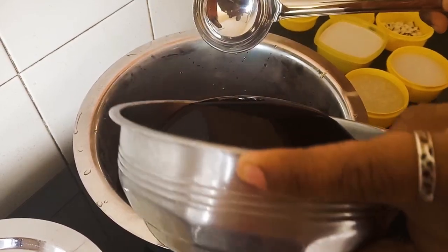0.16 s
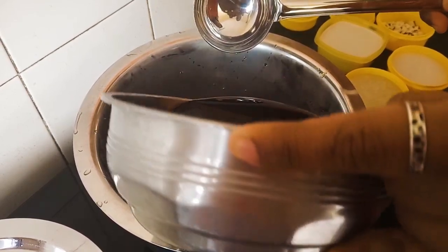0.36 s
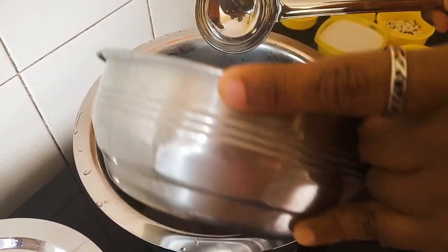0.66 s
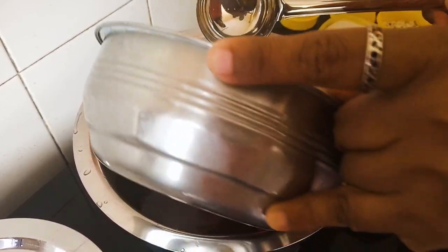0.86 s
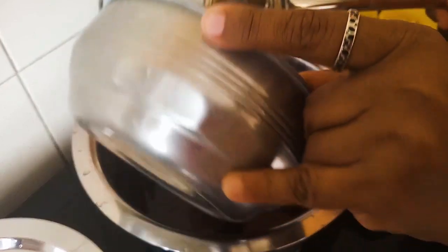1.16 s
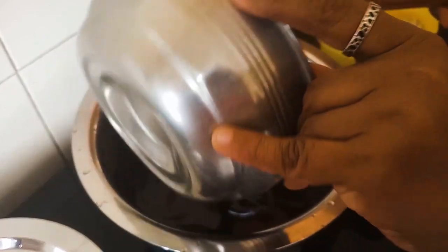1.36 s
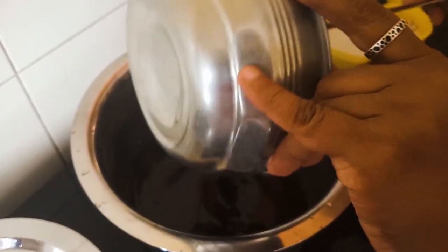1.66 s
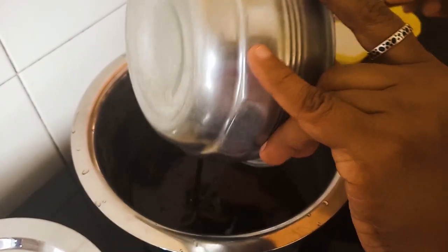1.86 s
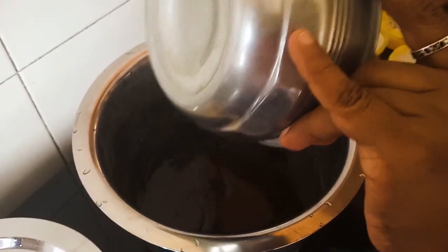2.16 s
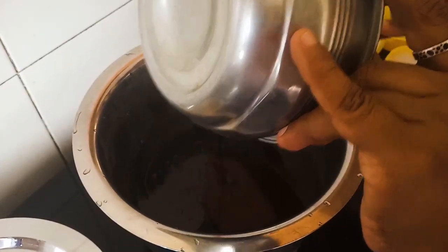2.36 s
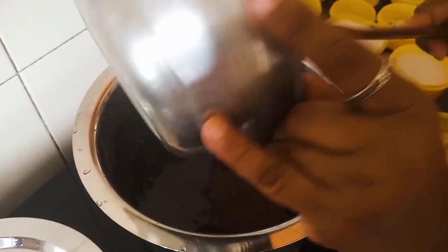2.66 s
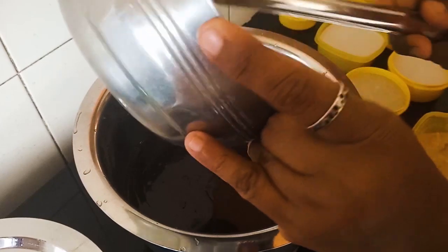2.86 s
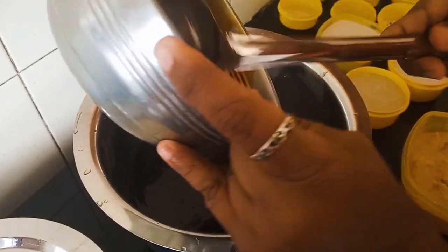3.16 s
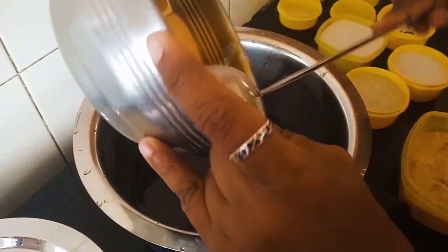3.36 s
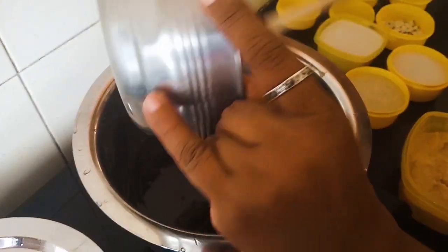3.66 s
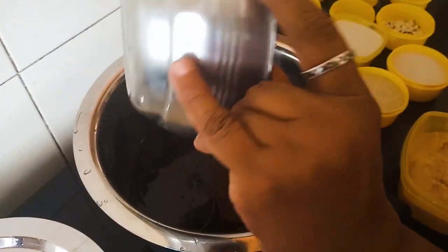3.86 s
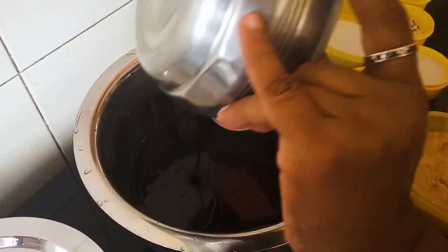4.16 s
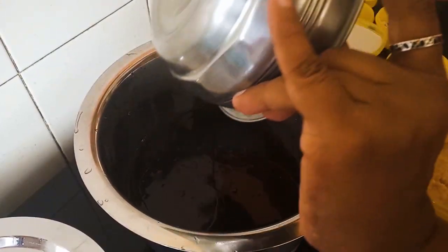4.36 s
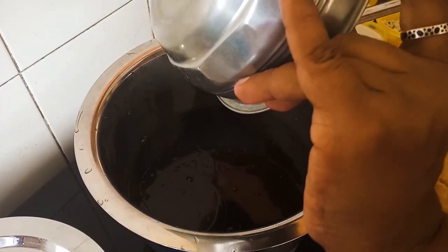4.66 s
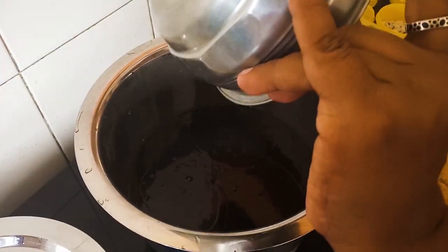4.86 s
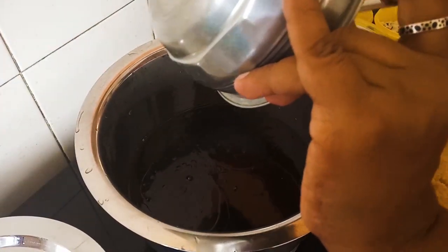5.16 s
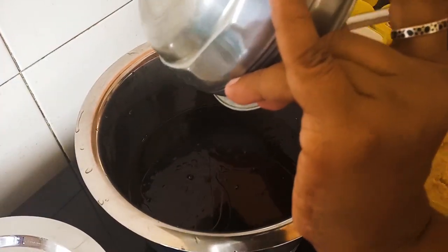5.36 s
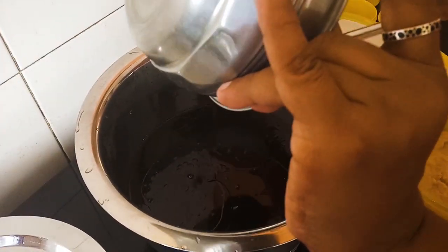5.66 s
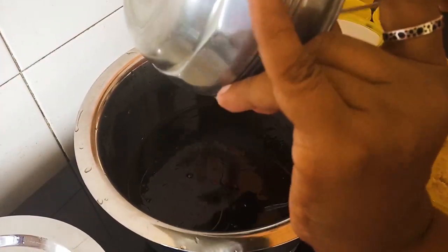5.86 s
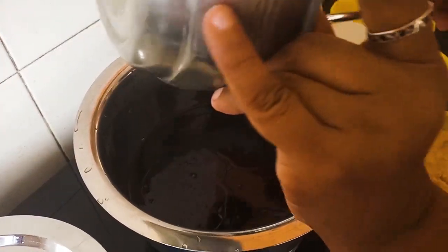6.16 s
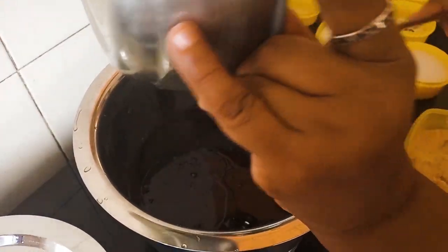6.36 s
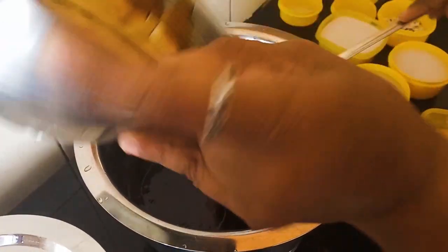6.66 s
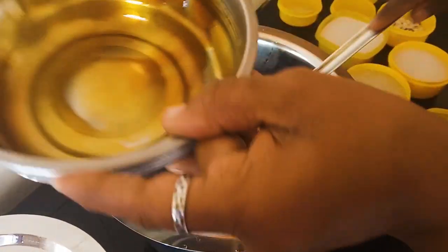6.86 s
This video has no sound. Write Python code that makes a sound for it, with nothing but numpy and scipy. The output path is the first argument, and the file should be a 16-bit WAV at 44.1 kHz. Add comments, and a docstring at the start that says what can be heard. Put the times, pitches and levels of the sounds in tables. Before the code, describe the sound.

A close microphone in a small tiled kitchen. From 0 s thick syrup pours into a hot steel pot: a bright, fierce sizzle settles quickly over a hollow, resonant churn, with a strong glug near 0.3 s and faint wavering hollow tones until 1.2 s. The stream thins and breaks off around 2.1-2.3 s, as a dull rim bump and hard ringing taps arrive, with short scrapes to 2.5 s. At 2.8-2.95 s a ladle clinks with a clear note, then a long, growing scrape with taps and small glugs runs to 3.5 s. A rim bump at 3.9 s leads to light scrapes, then brisk taps and strokes at 4.4-4.65 s. Another sharp group, partly hollow and humming, fills 5.0-5.5 s. After a quiet gap, two quick taps and a scrape at 6.25 s meet a soft low shudder until 6.7 s. Only faint hush and a barely audible tick at 6.9 s remain.

```python
"""Thick syrup runs in a thinning stream from a steel vessel into a hot steel pot: bubble impulses drive the
pot's resonances and a hot-steel sizzle, and trapped air glugs as clusters of rising chirps.
The vessel bumps the rim; a steel ladle clinks, taps its wet wall and scrapes it in short strokes: damped
modes and noisy snaps, struck once or driven by stick-slip grains. A low shudder follows late on.
A small tiled kitchen answers, over a faint steady hush; the microphone is close."""
import sys
import numpy as np
from scipy import signal
from scipy.fft import rfft, irfft, next_fast_len
from scipy.io import wavfile
from scipy.ndimage import uniform_filter1d

SR = 44100
rng = np.random.default_rng(int(sys.argv[2]) if len(sys.argv) > 2 else 0)


def master_out(mix):
    """Clip the mix to full scale and print it as 16-bit PCM to the path in sys.argv[1]."""
    frames = np.transpose(np.atleast_2d(mix))
    ceiling = np.clip(frames, -1, 1)
    pcm = np.round(ceiling * 32767).astype(np.int16)
    wavfile.write(sys.argv[1], SR, pcm)


N = 309818


def amp(db):
    """Decibels to gain."""
    return 10 ** (np.asarray(db) / 20)


def unit(x):
    """Scale to rms 1."""
    return x / np.sqrt(np.mean(x ** 2) + 1e-20)


def unit_attack(x):
    """Scale so that the first 20 ms have rms 1."""
    return x / np.sqrt(np.mean(x[:SR // 50] ** 2) + 1e-20)


def clock(count):
    """Times of the first count samples, in seconds."""
    return np.arange(count) / SR


def along(points, hz):
    """Interpolate (Hz, value) points on a log frequency axis."""
    point_hz, value = np.transpose(points)
    return np.interp(np.log(hz + 1), np.log(point_hz + 1), value)


def wobble(rate_hz, count=N):
    """A smooth random curve with rate_hz knots a second."""
    knots = rng.standard_normal(int(count * rate_hz / SR) + 4)
    fine = signal.resample_poly(knots, 8, 1)
    return np.interp(clock(count) * rate_hz * 8, np.arange(len(fine)), fine)


def add(track, s, sound):
    """Mix a sound into the track at time s."""
    part = track[max(round(s * SR), 0):][:len(sound)]
    part += sound[:len(part)]


def gate(t, start_s, end_s, attack_s, release_s):
    """Rise after start, hold until end, then fall to silence."""
    rise = np.clip((t - start_s) / attack_s, 0, 1)
    return rise * np.clip(1 - (t - end_s) / release_s, 0, 1)


def fade(t60_s, size=12288):
    """A ring envelope: onset time constant 0.65 ms, decay of 60 dB in t60_s."""
    t = clock(size)
    return np.exp(-np.log(1000) * t / t60_s) * (1 - np.exp(-t / 0.00065))


def coloured(x, points):
    """Shape a noise with the gain of (Hz, dB) points."""
    m = next_fast_len(len(x) + 8192)
    gain = amp(along(points, np.fft.rfftfreq(m, 1 / SR)))
    return irfft(rfft(x, m) * gain, m)[:len(x)]


def resonate(x, peaks):
    """Pass x through parallel (centre Hz, width Hz, dB) resonances."""
    m = next_fast_len(len(x) + SR // 4)
    f = np.fft.rfftfreq(m, 1 / SR)
    response = sum(amp(db) * 1j * f * w / (c * c - f * f + 1j * f * w) for c, w, db in peaks)
    return irfft(rfft(x, m) * response, m)[:len(x)]


def grains(rate_hz, spread_db):
    """Random one-sample impulses of uneven size, rms 1."""
    chance, polarity, spread = rng.random(N), rng.standard_normal(N), rng.standard_normal(N)
    return unit((chance < rate_hz / SR) * np.sign(polarity) * amp(spread_db * spread))


def cloud(colour, count, size=12288):
    """A sum of count modes at random pitches and of uneven strength, rms 1."""
    lines = np.zeros(size // 2 + 1, complex)
    picks = rng.integers(1, len(lines), count)
    lines[picks] = rng.standard_normal(count) + 1j * rng.standard_normal(count)
    return unit(irfft(lines * amp(along(colour, np.fft.rfftfreq(size, 1 / SR)))))


# still-room colour: freq_hz, density_db_per_hz
ROOM_COLOUR = [(20, -27.5), (60, 2), (110, 2.5), (200, -11), (400, -10), (600, -6), (900, -17), (1300, -23),
               (3000, -20), (6000, -27), (10000, -31), (13000, -46), (16000, -58)]
HUSH_DB = -75.5


def hush():
    """The still kitchen: steady coloured noise."""
    return amp(HUSH_DB) * unit(coloured(rng.standard_normal(N), ROOM_COLOUR))


def whine():
    """A very faint, narrow high band of noise."""
    return amp(-88.5) * unit(resonate(rng.standard_normal(N), [(6490, 25, 0)]))


# kitchen reverberation: freq_hz, t60_s
KITCHEN_T60 = [(150, 0.25), (400, 0.76), (1000, 0.53), (3000, 0.61), (7000, 0.43), (15000, 0.33)]
TAIL_STEP_S = .3


def kitchen(x):
    """Tiled walls return a short bright tail, whose colour drifts at random, crossfading every 0.3 s."""
    out, size = np.zeros(N), int(TAIL_STEP_S * SR)
    for start in range(0, N, size):
        hz, t, z = signal.stft(rng.standard_normal(SR), SR, nperseg=256)
        decay = np.exp(-np.log(1000) * t / along(KITCHEN_T60, hz)[:, None])
        tail = signal.istft(z * decay, SR, nperseg=256)[1]
        tail *= 1 - np.exp(-(clock(len(tail)) / 0.0027) ** 2)
        # triangular windows crossfade from one tail to the next
        span = np.arange(max(start - size, 0), min(start + size, N))
        part = x[span] * (1 - np.abs(span - start) / size)
        add(out, span[0] / SR, signal.fftconvolve(part, tail / np.linalg.norm(tail)))
    return out


RUMBLE_S, RUMBLE_END_S, RUMBLE_RAMP_S = 6.28, 6.68, .045
JOLT_DB, JOLT_DECAY_S, TREMBLE_DB = -40, .05, -63


def rumble():
    """A soft low shudder as the hand turns the vessel upright: a jolt dies to a faint tremble."""
    hollow, t = [(146, 47, 0)], clock(N)
    jolt = amp(JOLT_DB) * np.exp(-np.maximum(t - RUMBLE_S, 0) / JOLT_DECAY_S)
    envelope = gate(t, RUMBLE_S, RUMBLE_END_S, RUMBLE_RAMP_S, RUMBLE_RAMP_S)
    noise = resonate(resonate(rng.standard_normal(N), hollow), hollow)
    return unit(noise) * (jolt + amp(TREMBLE_DB)) * envelope


# pot modes woken by every contact: freq_hz, width_hz, level_db
AFTERRING_MODES = [(540, 3, 0), (640, 4, -3), (672, 4, -1), (1280, 3, -6), (2990, 3, -8), (4030, 3, -3),
                   (4950, 3, -6), (6630, 2, -5)]
AFTERRING_DB = 2


def afterring(metal):
    """Every contact wakes long faint modes in the pot."""
    return amp(AFTERRING_DB) * resonate(metal, AFTERRING_MODES)


def ring(modes, vary_db):
    """Damped sine modes, at new strengths for each place of contact."""
    hz, db, t60_s = np.transpose(modes)[:, :, None]
    decay = fade(t60_s)
    swing = np.sin((2 * np.pi * hz * clock(decay.shape[1])).astype(np.float32))
    strength = amp(db + vary_db * rng.standard_normal(hz.shape))
    return unit_attack(np.sum(strength * decay * swing, axis=0))


def shimmer(colour, t60_s, snap_db, snap_t60_s):
    """A noisy contact: a hard snap with a wash under one shared dense spectrum."""
    envelope = fade(t60_s) + amp(snap_db) * fade(snap_t60_s)
    return unit_attack(cloud(colour, count=6000) * envelope)


def steel(colour, t60_s, snap_db, snap_t60_s):
    """Thin steel has hundreds of high modes, under a brief noisy snap."""
    modes = cloud(colour, count=260) * fade(t60_s)
    snap = cloud(colour, count=3000) * fade(snap_t60_s)
    return unit_attack(modes + amp(snap_db) * snap)


def favour(colour, hz, boost_db):
    """The place of contact favours the modes around one pitch."""
    f = np.geomspace(100, 16000, 120)
    boost = boost_db * np.exp(-.5 * (np.log(f / hz) / 0.085) ** 2)
    return np.transpose([f, along(colour, f) + boost])


# syrup left inside weighs the shell down: time_s, pitch_share (of the empty vessel's)
DRAINING_PITCH = [(2.06, .9), (2.44, .923), (2.83, .983), (4.6, .995), (5.35, 1.004)]


def drained(s):
    """Pitch of the shell at time s, as a share of the empty vessel's."""
    return np.interp(s, *np.transpose(DRAINING_PITCH))


# short hollow resonances: freq_hz, level_db, t60_s
BELLY_MODES = [(748, -11, 0.094), (799, -6.5, 0.076), (901, 5.5, 0.069), (846, 6, 0.016), (960, 2, 0.034)]
# low shell modes, tuned by draining: freq_hz, level_db, t60_s
SHELL_MODES = [(958.2, 4, 0.12), (1081, -2, .06)]
BASS_HZ = 553  # a small vessel radiates little below this


def belly_ring(s):
    """The vessel's hollow note at time s; the grip detunes its resonances a little each time."""
    modes = [(hz * (1 + rng.normal(0, .015)), db, t60_s) for hz, db, t60_s in BELLY_MODES]
    modes += [(hz * drained(s), db, t60_s) for hz, db, t60_s in SHELL_MODES]
    note = ring(modes, vary_db=2)
    note = note * (1 - np.exp(-clock(len(note)) / 0.0061))
    return unit_attack(signal.lfilter(*signal.butter(2, BASS_HZ, "high", fs=SR), note))


# strongest high wall modes: freq_hz, level_db, t60_s
WALL_MODES = [(2720, -9, .14), (3110, -7, .14), (3450, -2, .14), (3590, 1, .14), (3900, -5, .2),
              (4450, -3, .14), (4800, -3, .14), (5164, -1, .18), (5440, -1, .16), (5795, 0, .14),
              (6070, -1, .14), (6600, -1, .14), (7020, -2, .14)]
WALL_RING_VARY_DB, WALL_DETUNE_SHARE = 5, .016


def wall_ring(place_hz):
    """The pressing edge favours wall modes near one pitch and pulls them a little out of tune."""
    modes = []
    for hz, db, t60_s in WALL_MODES:
        near_db = 4 * np.exp(-.5 * (np.log(hz / place_hz) / .14) ** 2)
        modes.append((hz * (1 + WALL_DETUNE_SHARE * rng.standard_normal()), db + near_db, t60_s))
    return ring(modes, vary_db=WALL_RING_VARY_DB)


# contact colours, each: freq_hz, density_db_per_hz
THUD_COLOUR = [(40, -32.5), (100, -8.5), (200, -8.5), (330, 2), (450, -2), (620, 2.5), (1000, -14),
               (1800, -33), (8000, -56)]
CLACK_COLOUR = [(300, -24), (900, 0.5), (1100, 4), (1650, 0), (2050, -4), (2800, -18), (5000, -27),
                (10000, -56.5)]  # dull, steel on steel
WALL_SPECTRUM = [(200, -45.5), (1300, -23), (2500, -11.5), (3400, -4), (5300, -2), (6900, -5),
                 (8000, -10.5), (10000, -36.5), (16000, -42.5)]
CRACK_SPECTRUM = [(1000, -48), (6000, -9), (8200, -1.5), (9800, 3.5), (11200, 0.5), (12500, -6),
                  (15500, -9)]
WALL_RING_DB, CRACK_DB = -6, -1.5
CLICK_DB, CLICK_T60_S = -11.5, .009  # first bite of steel on steel


def contact(s, thud, hollow, clack, edge, hz):
    """One contact thuds, rings the belly and wall, and cracks at the edge; strengths are gains before trims."""
    wall = steel(favour(WALL_SPECTRUM, hz, boost_db=11.0), t60_s=0.2, snap_db=4.5, snap_t60_s=0.048)
    wall = wall + amp(WALL_RING_DB) * wall_ring(hz)
    crack = steel(CRACK_SPECTRUM, t60_s=0.056, snap_db=-11.5, snap_t60_s=0.023)
    click_colour = [(500, -22.5), (3000, -9), (7000, 4.0), (15000, -10.5)]
    click = unit_attack(cloud(click_colour, count=6000) * fade(CLICK_T60_S))
    return (thud * amp(-6.5) * shimmer(THUD_COLOUR, t60_s=0.37, snap_db=9.0, snap_t60_s=0.094)
            + hollow * amp(-4.5) * belly_ring(s)
            + clack * amp(-5.0) * shimmer(CLACK_COLOUR, t60_s=0.16, snap_db=11.0, snap_t60_s=0.02)
            + edge * amp(-6.0) * (wall + amp(CRACK_DB) * crack + amp(CLICK_DB) * click))


# rim bumps: time_s, strength_db, hollow_db, wall_db (last two relative to strength, before contact trims)
RIM_BUMPS = [(2.058, -26.5, 10, -14.5), (3.902, -33, -7, -2.5), (4.048, -48, 11.5, -7),
             (4.066, -48, 9, 2.5), (4.107, -60.5, 1, -6)]
REBOUND_S, REBOUND_DB, BUMP_THUD_DB = .013, -7, -6.5


def bumps():
    """The held vessel meets the pot's rim with a dull clack and bounces once."""
    out = np.zeros(N)
    for s, db, hollow_db, wall_db in RIM_BUMPS:
        for late_s, loss_db, clack in (0, 0, 1), (REBOUND_S, REBOUND_DB, .45):
            blow = contact(s, amp(BUMP_THUD_DB), amp(hollow_db), clack, amp(wall_db), hz=6500)
            add(out, s + late_s, amp(db + loss_db) * blow)
    return out


# bowl hits and bounces: time_s, strength_db, ring_db, wall_db, wall_pitch_hz
# (ring and wall relative to strength, before trims)
BOWL_CLINKS = [(2.831, -23, 3.5, -8, 6300), (2.89, -28, -10, 4, 7050), (2.899, -27, -7, -2, 6900),
               (2.947, -36, -16, 3, 7600), (3.124, -40, -14, 8, 3300), (3.188, -42, -8, 3, 3400)]
# ladle modes: freq_hz, level_db, t60_s
LADLE_MODES = [(1018, -3, 0.06), (1290, -4, .12), (1362, -3, .14), (1440, 0, .08), (1674, -1, .04),
               (2374, 5, 0.5), (2392, -8, .3), (2993, -17, .17), (4199, -1, .045), (4215, -16, .4),
               (5512, -15, .4), (6067, -7, 0.37), (6691, -20, .45)]
FREE_S, DAMPED_DB_PER_S = 0.054, 380  # rings freely, then settles on the wet wall
CLINK_HOLLOW_DB, CLINK_THUD_DB = 0, -11


def clinks():
    """The ladle's bowl clacks on the vessel and rings with one clear note until it comes to rest."""
    out = np.zeros(N)
    for s, db, ring_db, wall_db, hz in BOWL_CLINKS:
        note = ring(LADLE_MODES, vary_db=1)
        note = note * amp(-DAMPED_DB_PER_S * np.maximum(clock(len(note)) - FREE_S, 0))
        blow = contact(s, amp(CLINK_THUD_DB), amp(CLINK_HOLLOW_DB), 1, amp(wall_db), hz)
        add(out, s, amp(db) * (blow + amp(ring_db - 1.0) * note))
    return out


# strokes: start_s, end_s, pressure_db (before trim), swell_db (over the stroke), hollow_db, hiss_db
# (both relative to the wall), wall_pitch_hz
SCRAPE_STROKES = [(2.215, 2.262, -38, 0, 1, -2.5, 5200), (2.299, 2.462, -30.5, -3, -6.5, 0.5, 5800),
                  (2.947, 3.545, -32, 14.5, -13.5, -3.5, 5400),
                  (3.921, 4.031, -43.5, -0.5, -14.5, -4, 5960),
                  (3.998, 4.196, -41.5, -15.5, -19.5, -6.5, 4670), (4.288, 4.402, -58, 11, -9.5, -7, 4740),
                  (4.391, 4.46, -35, -5, -26.5, -5, 4870), (4.517, 4.643, -46.5, -10.5, 2, 10, 6150),
                  (5.083, 5.154, -29.5, 2, -28.5, -7.5, 4200), (5.183, 5.5, -39.5, 5.5, -8.5, 7.5, 6100),
                  (5.221, 5.262, -26.5, -6.5, -24.5, -0.5, 6500), (6.232, 6.307, -34, 4, -13.5, 2.5, 5240),
                  (6.863, 6.97, -70, -16, -9, -9.5, 4620)]
SCRAPE_RING_DB = -4
BITE_S, LIFT_S = 0.035, 0.015  # the edge takes hold and lifts off
BRIGHTEN_DB = 0.5  # more hiss as the edge wipes the wall clean


def scrapes():
    """The ladle's edge sticks and slips along the wall; as it travels, other modes take over."""
    out, size = np.zeros(N), SR // 8
    slips = unit(grains(rate_hz=600, spread_db=3.5) * amp(2.3 * wobble(70)))
    window = np.sin(np.pi * np.arange(size) / size)
    for begin, end, db, swell_db, hollow_db, hiss_db, hz in SCRAPE_STROKES:
        for start in range(int(begin * SR) - size // 2, int((end + LIFT_S) * SR), size // 2):
            place_hz = hz * np.exp(rng.normal(0, 0.24))
            thud = shimmer(THUD_COLOUR, t60_s=0.082, snap_db=-6.5, snap_t60_s=.006)
            clack = shimmer(CLACK_COLOUR, t60_s=0.051, snap_db=0.5, snap_t60_s=0.0052)
            belly = belly_ring(begin) + amp(-15.5) * thud + amp(-4.0) * clack
            place_colour = favour(WALL_SPECTRUM, place_hz, boost_db=7.5)
            wall = steel(place_colour, t60_s=0.099, snap_db=16.5, snap_t60_s=0.004)
            wall = wall + amp(SCRAPE_RING_DB) * wall_ring(place_hz)
            crack = steel(CRACK_SPECTRUM, t60_s=0.1, snap_db=5.5, snap_t60_s=0.0068)
            t = start / SR + clock(size)
            travel = np.clip((t - begin) / (end - begin), 0, 1) - .5
            pressure = gate(t, begin, end, BITE_S, LIFT_S) * amp(db - 4.0 + swell_db * travel)
            force = slips.take(start + np.arange(size), mode="wrap") * window * pressure
            layers = (belly, hollow_db), (wall, 0), (crack, hiss_db + BRIGHTEN_DB * travel)
            for body, share_db in layers:
                scrape = signal.fftconvolve(force * amp(share_db), body / np.linalg.norm(body))
                add(out, start / SR, scrape)
    return out


# edge taps: time_s, strength_db, hollow_db (relative to strength, before contact trim), wall_pitch_hz
EDGE_TAPS = [(2.168, -15.5, -17.5, 4740), (2.321, -35, 2, 3700), (2.358, -24, -25.5, 6550),
             (2.373, -17, -0.5, 5850), (2.999, -36.5, 2, 5300), (3.258, -31, -12, 3500),
             (3.438, -24, -6.5, 6550), (3.491, -25, -5, 3550), (3.518, -33, -10, 5100),
             (4.29, -54, 4.5, 3580), (4.414, -38.5, -17, 5000), (4.505, -22.5, -14.5, 5900),
             (4.582, -29.5, 11, 5700), (4.612, -29.5, 4, 6450), (4.644, -41.5, -15, 6900),
             (4.986, -18, -10.5, 4670), (5.16, -31.5, -32, 5600), (5.187, -21.5, -7.5, 5250),
             (5.324, -35.5, 5, 5700), (5.35, -30.5, 10.5, 6200), (5.377, -28, 4, 6360),
             (5.503, -30.5, -10.5, 6360), (6.241, -24, -10, 5800), (6.254, -29, -5, 6200),
             (6.323, -32, -20, 4560), (6.914, -58, -33, 6800)]
TAP_THUD_DB, HARD_TAP_DB = -11.5, -14.5
THUD_GROWTH = 0.71  # dB of extra thud per dB of strength: only hard taps shake the whole vessel
TAP_CLACK_DB, HOLLOW_CLACK_DB = -41, -18.5  # clack with every tap, and with its hollow note


def taps():
    """The ladle's edge rings the thin wall; the deeper it lands, the more the belly answers."""
    out = np.zeros(N)
    for s, db, hollow_db, hz in EDGE_TAPS:
        clack = amp(TAP_CLACK_DB) + amp(hollow_db + HOLLOW_CLACK_DB)
        thud = amp(TAP_THUD_DB + THUD_GROWTH * (db - HARD_TAP_DB))
        add(out, s + .001, amp(db) * contact(s, thud, amp(hollow_db), clack, 0.86, hz))
    return out


# the vessel's two longest modes: freq_hz, level_db, t60_s
HUM_MODES = [(958, 0, .55), (1114, -7, .3)]
HUM_DB, HUM_FOLLOWS = -13, 0.75  # level under a tap; dB of hum per dB of hollow note


def hum():
    """Each tap tops up the vessel's narrow hum, which then dies away smoothly."""
    t, out = clock(N), np.zeros(N)
    for hz, mode_db, t60_s in HUM_MODES:
        energy = np.zeros(N)
        for s, db, hollow_db, _ in EDGE_TAPS:
            level = amp(db + HUM_FOLLOWS * hollow_db + HUM_DB + mode_db)
            add(energy, s, (level * fade(t60_s, size=SR)) ** 2)
        phase = 2 * np.pi * hz * np.cumsum(drained(t)) / SR + .25 * wobble(12)
        out += np.sqrt(energy) * np.sin(phase)
    return out


def bubble(hz):
    """An air bubble: a short ring with a soft start and a rising pitch."""
    t = clock(SR // 10)
    cycles = hz * t * (1 + 0.78 * t)
    return np.sin(2 * np.pi * cycles) * np.exp(-cycles / 4.2) * (1 - np.exp(-cycles / 1.6))


# bubble clusters: time_s, level_db, pitch_hz, half_length_s, scatter (of log pitch)
GLUG_CLUSTERS = [(0.269, -21.5, 310.5, 0.0082, 0.297), (0.337, -44.5, 184, 0.066, 0.29),
                 (1.243, -39.5, 850, 0.056, 0.16), (1.642, -45.5, 730, 0.027, 0.28),
                 (2.425, -37.5, 598, .025, 0.22), (3.261, -35, 710, 0.0057, .16),
                 (3.292, -35, 714, 0.0079, 0.081), (3.379, -41, 717, 0.054, 0.081),
                 (3.436, -28, 771, .009, 0.171), (3.495, -35.5, 657, 0.023, 0.155),
                 (4.218, -46, 1076, 0.0072, 0.41), (4.248, -52, 837, 0.029, 0.35),
                 (5.375, -46, 560, .035, .22), (6.275, -42, 560, .03, 0.29)]


def glugs():
    """Trapped air escapes in clusters of short bubbles of all sizes, whose pitch rises."""
    out = np.zeros(N)
    for s, db, hz, half_s, scatter in GLUG_CLUSTERS:
        cluster, count = np.zeros(SR // 2), 14 if half_s < .02 else 40
        ratios = np.exp(scatter * rng.permutation(np.linspace(-1.7, 1.7, count)))
        for place, ratio, late in zip(np.linspace(-1, 1, count), ratios, rng.standard_normal(count)):
            strength = np.sqrt(ratio) * np.exp(-1.6 * place ** 2)
            add(cluster, half_s * (2 + 1.6 * place + 0.09 * late), bubble(hz * ratio) * strength)
        # rms 1 over the cluster's nominal length
        loudness = np.sqrt(2 * half_s * SR / np.sum(cluster ** 2))
        add(out, s - .004 - 2 * half_s, amp(db) * cluster * loudness)
    return out


GURGLES_PER_S, GURGLE_HZ, GURGLE_SCATTER = 90, 660, .33  # scatter of log pitch
GURGLE_DB, GURGLE_SPREAD_DB = -1.5, 3


def gurgle():
    """The stream drags in single bubbles of uneven size at random moments."""
    out = np.zeros(N)
    draws = rng.standard_normal((300, 3))
    times_s = np.cumsum(draws[:, 0] ** 2) / GURGLES_PER_S
    for s, (_, size, strength) in zip(times_s, draws):
        level = amp(GURGLE_DB + GURGLE_SPREAD_DB * strength)
        add(out, s, level * bubble(GURGLE_HZ * np.exp(GURGLE_SCATTER * size)))
    return out


def patchy(x, depth_db):
    """Bubbles come in swarms: patches of pitch swell and fade on their own; rms 1."""
    z = signal.stft(x, nperseg=1024)[2]
    field = uniform_filter1d(rng.standard_normal(z.shape), size=5, axis=0)
    field = uniform_filter1d(field, size=5, axis=1)
    return unit(signal.istft(z * amp(depth_db * unit(field)), nperseg=1024)[1][:N])


# brief tones of the hollow: start_s, end_s, pitch_hz, level_db
SINGING_NOTES = [(.3, 0.6, 374, -45), (.42, 0.6, 528, -42), (.44, 0.74, 624, -44.5),
                 (.36, 1.09, 324, -51.5), (.7, 1.16, 468, -44.5), (.84, 1.23, 653.5, -47),
                 (1.14, 1.25, 681, -42)]


def hollow_singing(width_hz, waver, fall_per_s):
    """The hollow under the stream sings narrow, unsteady tones that swell, sink in pitch and fade."""
    out = np.zeros(N)
    for start, end, hz, db in SINGING_NOTES:
        t = clock(max(int((end - start) * SR), 2))
        phase = 2 * np.pi * np.cumsum(hz * (1 - fall_per_s * (t - t.mean()))) / SR
        tone = (1 + waver * wobble(width_hz, len(t))) * np.sin(phase)
        tone += waver * wobble(width_hz, len(t)) * np.cos(phase)
        add(out, start, amp(db) * unit(tone) * np.abs(np.sin(np.pi * t / t[-1])) ** 0.87)
    return out


# bubbles bursting on hot steel: freq_hz, density_db_per_hz
SIZZLE_COLOUR = [(250, -15), (600, -2), (1200, 0.5), (1450, -7), (2250, -0.5), (2750, -8.5), (3800, -6.5),
                 (4380, -3), (4900, -10.5), (6700, -8.5), (9000, -15.5), (11000, -25), (12500, -47),
                 (16000, -45.5)]
FIZZ_PATCH_DB, FLUTTER_DB, SWELL_DB = 1.8, .6, .8  # swarms, quick flutter, slower swell
SPITS_PER_S, SPIT_SPREAD_DB, SPIT_DB = 60, 4, -9


def sizzle(heat):
    """Tiny bubbles burst on hot steel, larger ones spit, and the fiercest heat throws a fine spray."""
    fizz = coloured(grains(rate_hz=5800, spread_db=3.0), [(60, -26.0)] + SIZZLE_COLOUR)
    fizz = patchy(fizz, FIZZ_PATCH_DB)
    pops = coloured(grains(SPITS_PER_S, SPIT_SPREAD_DB), [(60, -28.0)] + SIZZLE_COLOUR)
    # each spit rattles around the pot
    rattle = rng.standard_normal(SR // 20) * fade(.02, size=SR // 20)
    spits = unit(signal.fftconvolve(pops, rattle)[:N])
    # the bursting bubbles keep the pot's wall faintly singing
    wall_peaks = [(2090, 13, -6.5), (2227, 24, 2.0), (2444, 15, 4), (4375, 9.3, 2.0),
                  (5992, 17, -3), (6670, 18, 4.0), (7200, 25, 0.0)]
    singing = unit(resonate(fizz, wall_peaks))
    spray = unit(coloured(grains(rate_hz=1500, spread_db=2.5), CRACK_SPECTRUM))
    spray = spray * amp(-4.0) * heat * (heat / heat.max()) ** 1.9
    flicker = amp(FLUTTER_DB * wobble(22) + SWELL_DB * wobble(7.9))
    return (fizz + amp(SPIT_DB) * spits + amp(-13) * singing) * heat * flicker + spray


# pot air and wall resonances: freq_hz, width_hz, level_db
POT_MODES = [(325.7, 13, 5.5), (476, 8, 0.5), (567, 10, 0), (580, 40, -10), (631, 11, 8), (691, 20, 8.5),
             (828, 70, -1.5), (918, 14, 1), (1065, 7.1, 5.5), (1162, 34, 4.5)]
CHURN_PATCH_DB = 2.6


def churn(flow):
    """Splats of syrup drive the pot's resonances, with single bubbles gurgling among them."""
    colour = [(60, -11.5), (200, -19.5), (300, -2), (1300, -4.5), (2500, -10.0)]
    splats = coloured(grains(rate_hz=400, spread_db=5.5), colour)
    body = patchy(resonate(splats, POT_MODES), CHURN_PATCH_DB) + gurgle()
    return body * flow * amp(0.77 * wobble(24))


# the stream swells or narrows for a moment: time_s, half_length_s, level_db
STREAM_SURGES = [(0.047, 0.0051, 6.5), (0.278, 0.016, 12), (1.387, 0.0575, -3.5), (1.506, 0.055, -5)]
CHURN_DB, THINNING_DB_PER_S, POUR_END_S, BREAK_OFF_S = -33, 11, 2.12, .15
# a flare on bare hot steel settles as syrup covers it (time constant), then cools after the pour
SIZZLE_DB, FLARE_DB, COVER_S, COOLING_DB_PER_S, SIMMER_DB = -47, 19.5, 0.51, 17, -84
SURGE_SHARE = 0.91  # dB of sizzle per dB of surge


def pour():
    """The stream thins steadily and breaks off; it churns in the pot's hollow and sizzles to a simmer."""
    t = clock(N)
    surge_db = sum(db * np.exp(-((t - s) / half_s) ** 2) for s, half_s, db in STREAM_SURGES)
    break_off = np.clip(1 - (t - POUR_END_S) / BREAK_OFF_S, 0, 1)
    flow = amp(CHURN_DB - THINNING_DB_PER_S * t + surge_db) * break_off
    flare_db = FLARE_DB * np.exp(-t / COVER_S)
    cooling_db = COOLING_DB_PER_S * np.maximum(t - POUR_END_S, 0)
    heat = amp(SIZZLE_DB + flare_db + SURGE_SHARE * surge_db - cooling_db) + amp(SIMMER_DB)
    return churn(flow) + sizzle(heat) + hollow_singing(width_hz=23.0, waver=0.63, fall_per_s=0.0986)


def scene():
    """Syrup and steel in the kitchen, over its faint steady hush."""
    strikes = taps() + bumps() + clinks() + scrapes()
    metal = signal.lfilter(*signal.butter(2, 110, "high", fs=SR), strikes)
    near = metal + afterring(metal) + glugs()
    background = hush() + whine() + rumble()
    return (background + amp(-7.5) * kitchen(near) + near + hum() + pour())[None]


TOP_HZ = 15900


def record(dry):
    """The recorder keeps nothing above its band limit."""
    m = next_fast_len(N + SR // 4)
    in_band = np.fft.rfftfreq(m, 1 / SR) < TOP_HZ
    return irfft(rfft(dry, m) * in_band, m)[:, :N]


dry = scene()
out = record(dry)
master_out(out)
```